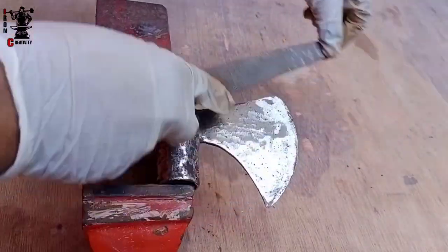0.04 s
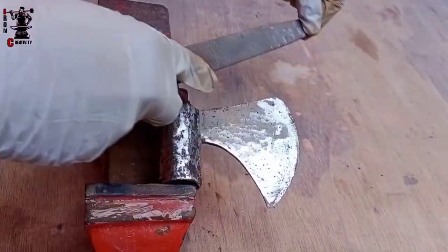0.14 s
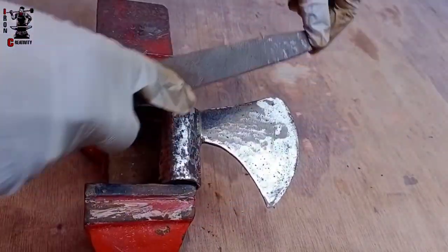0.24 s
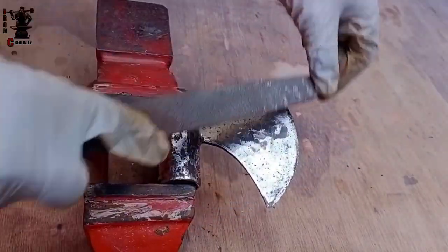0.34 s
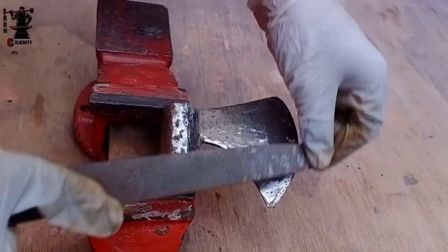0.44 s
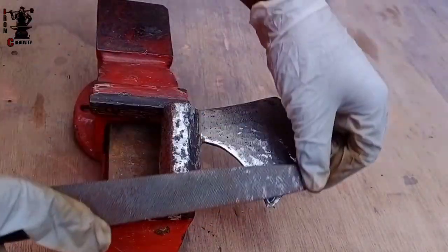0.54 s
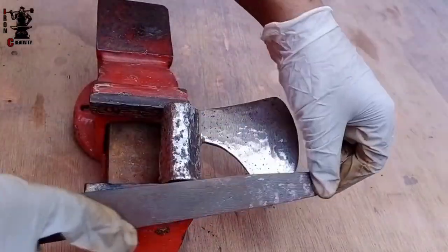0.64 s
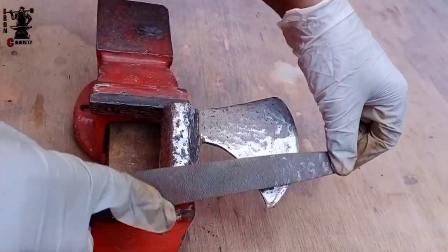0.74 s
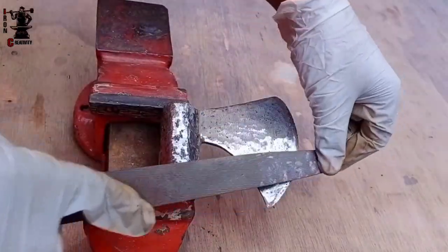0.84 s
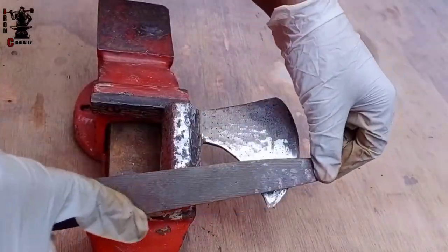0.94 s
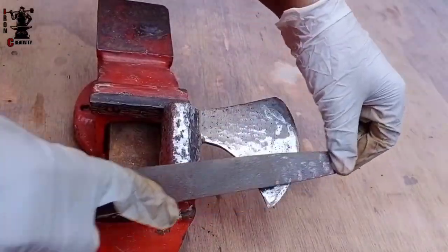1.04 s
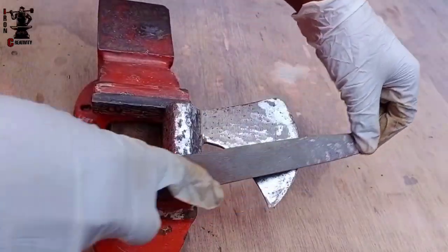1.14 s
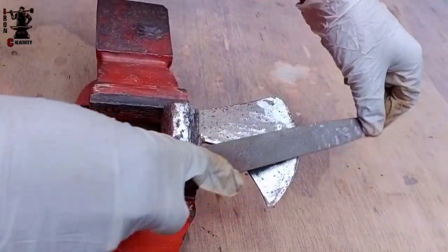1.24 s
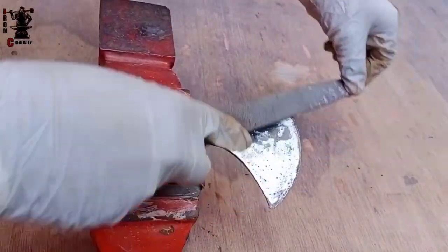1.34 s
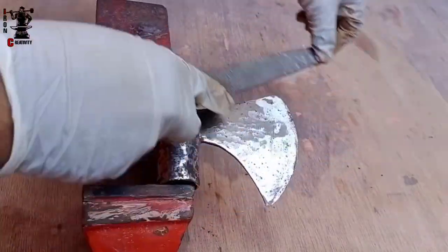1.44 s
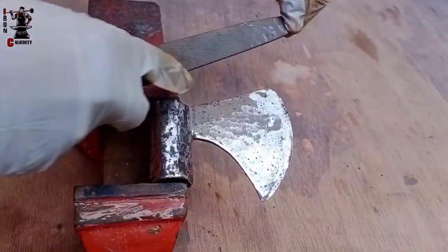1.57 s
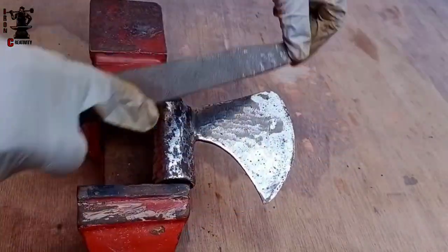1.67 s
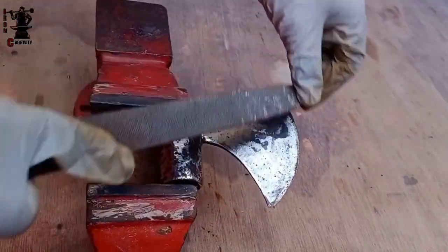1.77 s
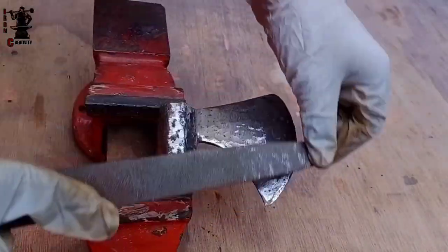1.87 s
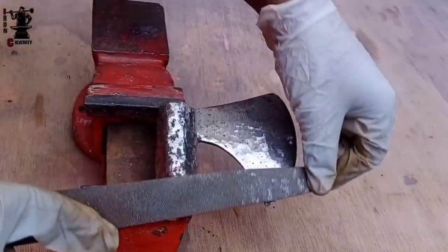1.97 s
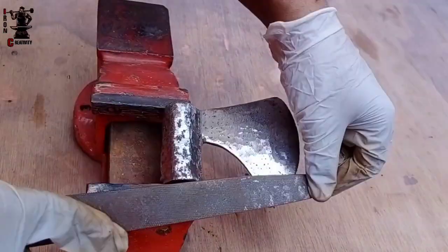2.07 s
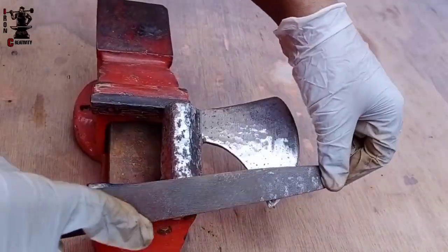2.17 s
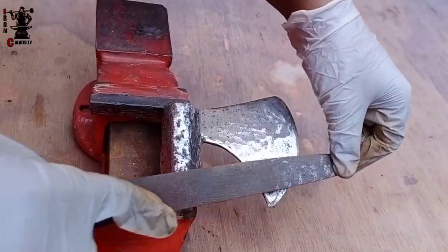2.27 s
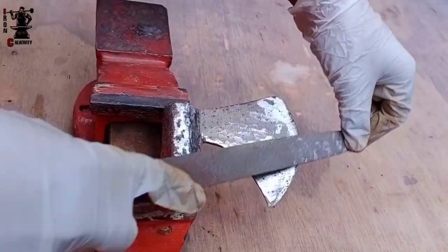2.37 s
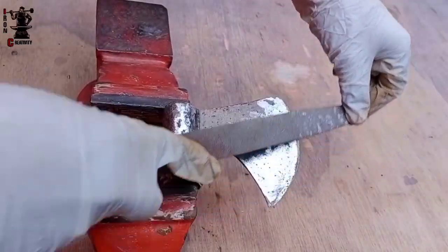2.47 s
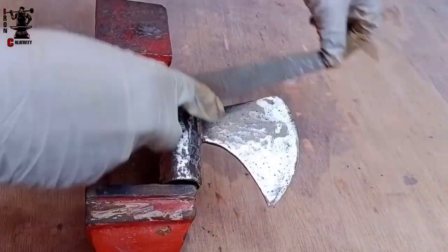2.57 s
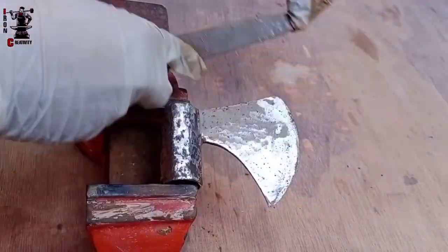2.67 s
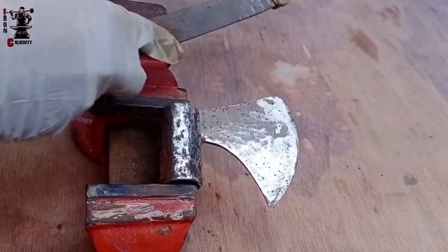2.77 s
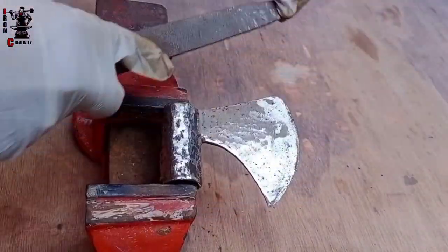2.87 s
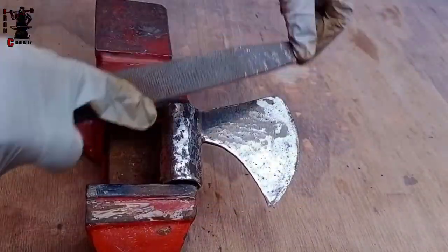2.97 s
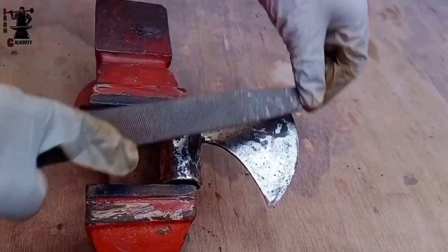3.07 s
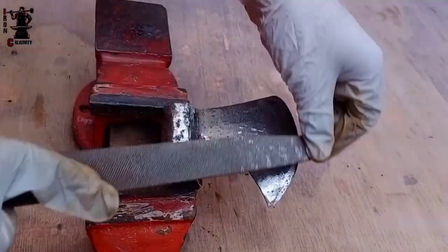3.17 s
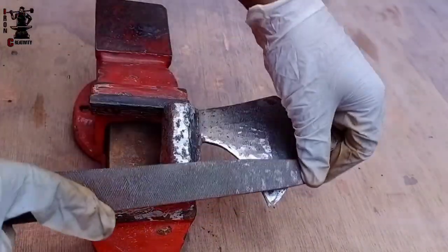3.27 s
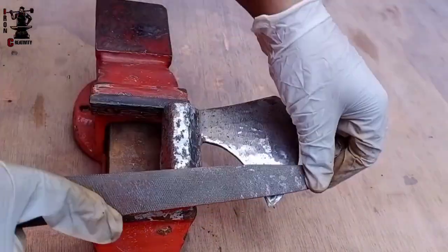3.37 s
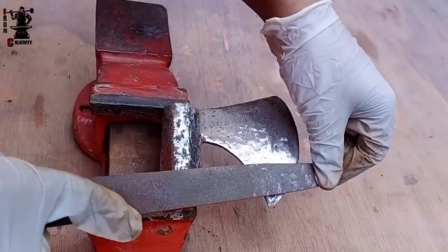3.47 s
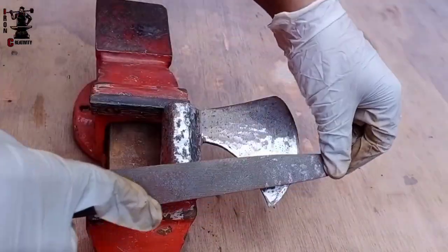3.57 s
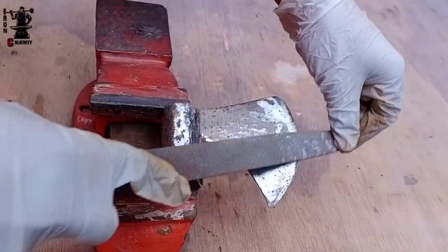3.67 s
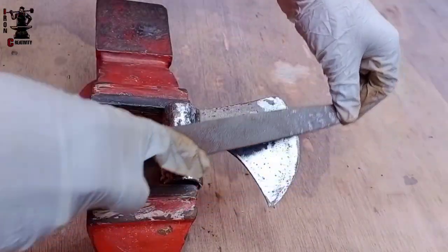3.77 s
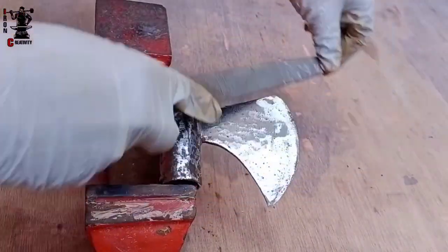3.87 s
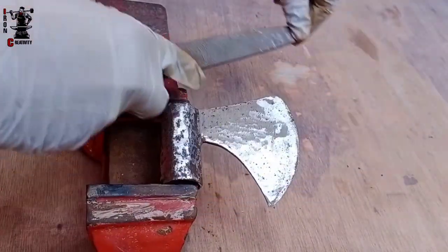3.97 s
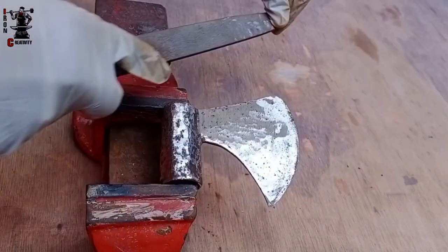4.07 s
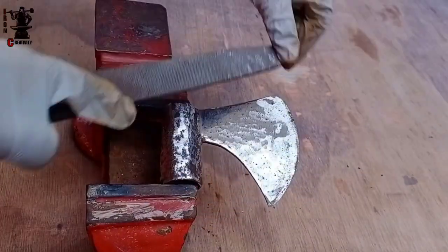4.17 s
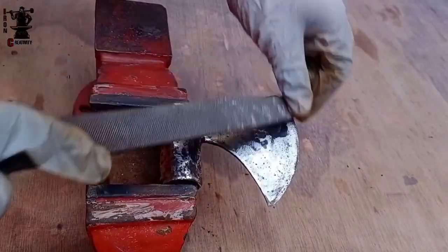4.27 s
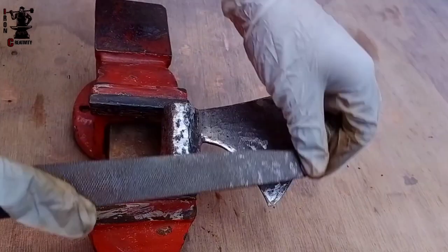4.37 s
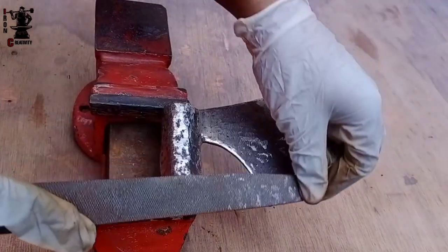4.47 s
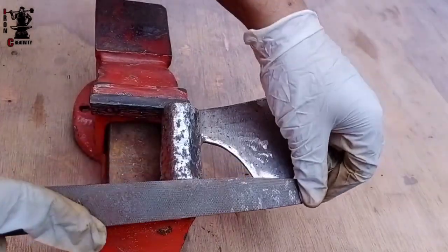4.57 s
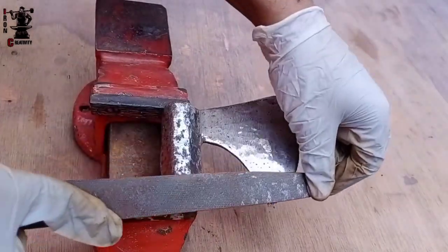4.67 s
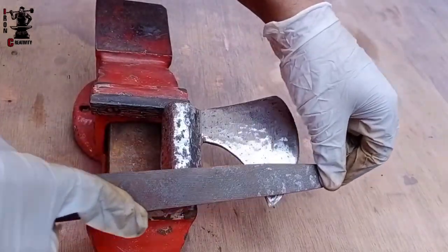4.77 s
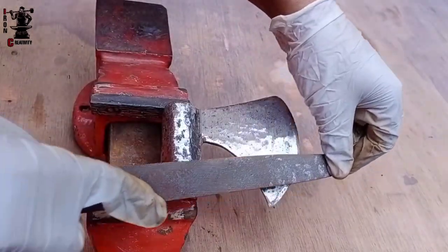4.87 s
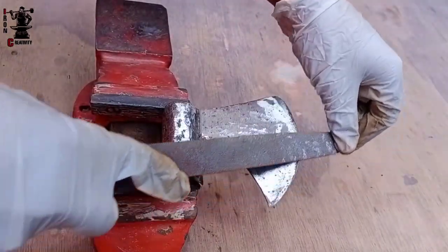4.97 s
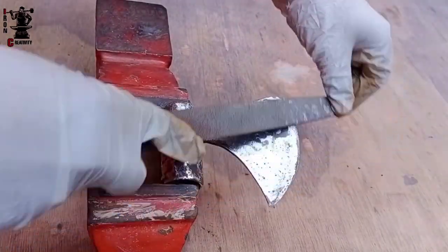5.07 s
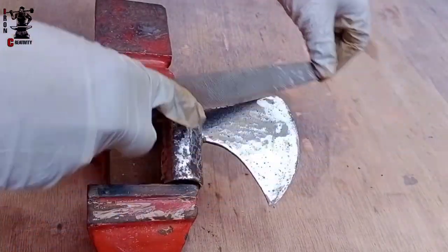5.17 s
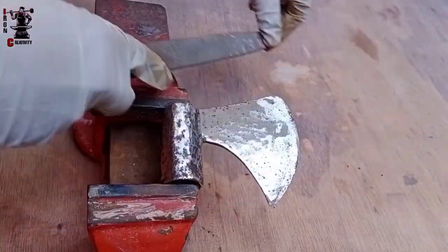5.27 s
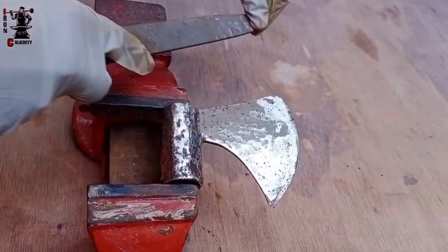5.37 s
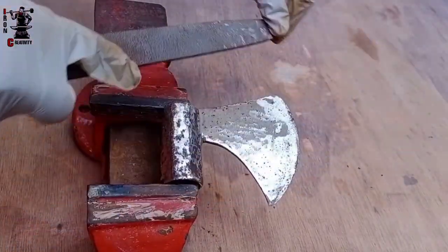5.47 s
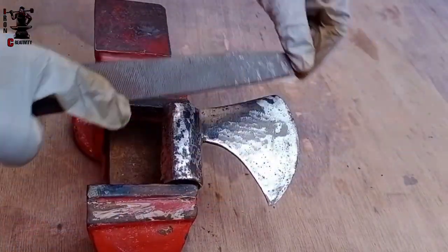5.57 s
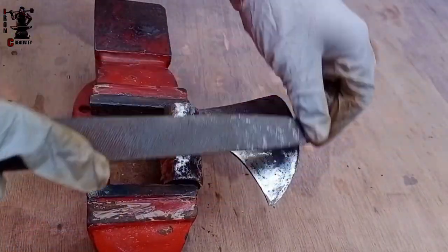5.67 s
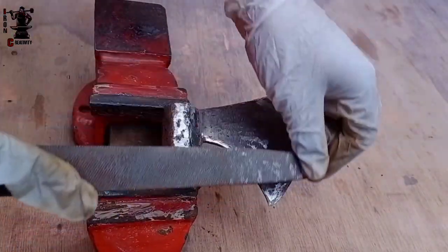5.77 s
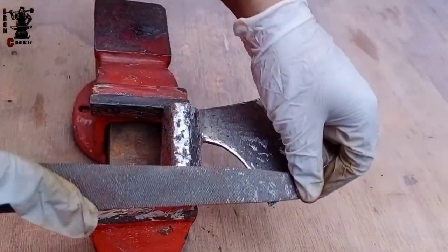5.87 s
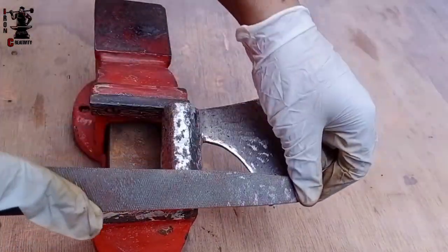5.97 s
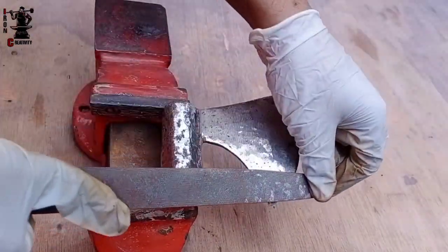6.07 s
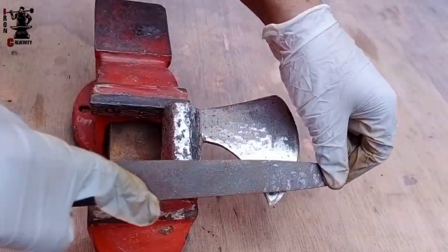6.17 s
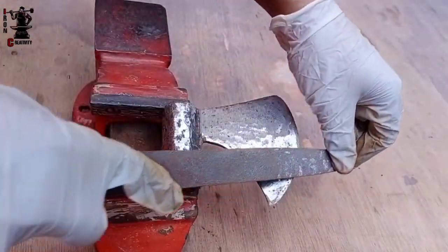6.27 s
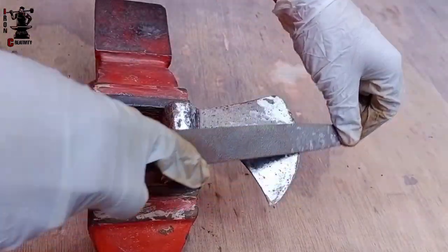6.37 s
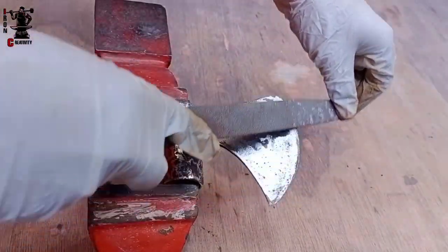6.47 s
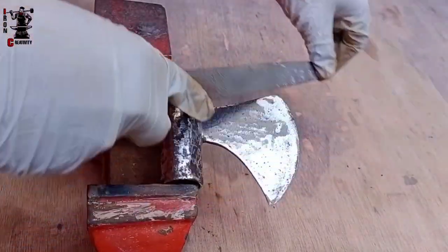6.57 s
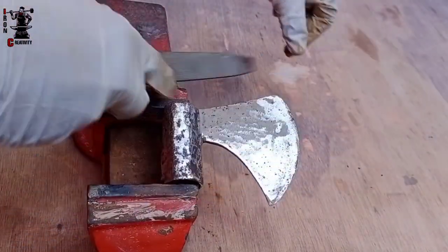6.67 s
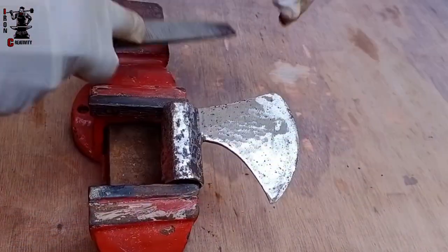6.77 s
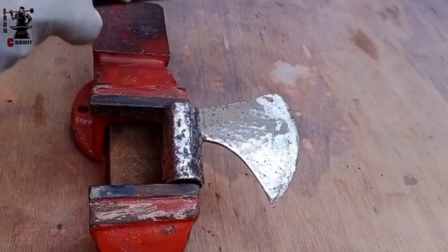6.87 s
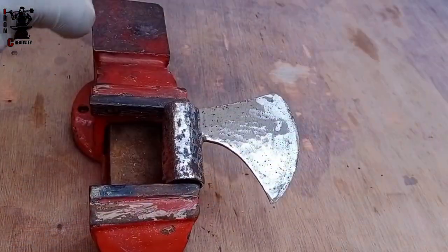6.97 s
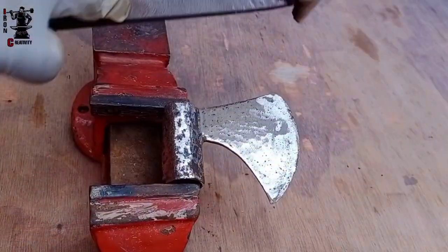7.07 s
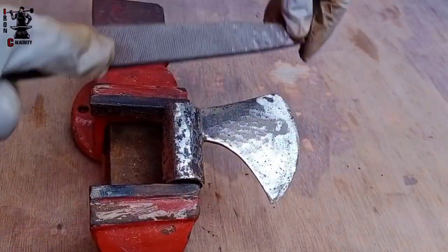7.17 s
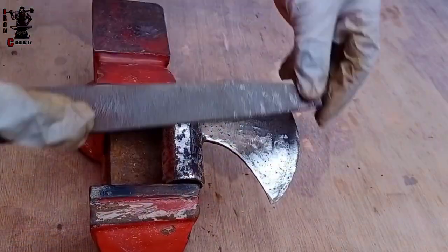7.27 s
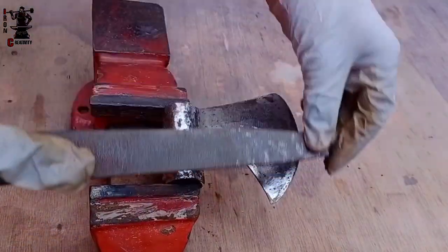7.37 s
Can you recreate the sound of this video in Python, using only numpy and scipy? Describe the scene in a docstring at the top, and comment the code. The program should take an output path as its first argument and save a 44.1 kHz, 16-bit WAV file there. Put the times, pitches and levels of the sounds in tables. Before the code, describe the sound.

Slow, separate strokes of a metal file grate on steel, harsh and toothy, with small catches and a low hum from the bench beneath. Each stroke ends abruptly, leaving a faint clear ring in a quiet room with short echo. After the last one the tool clacks, a glove slides softly, and light metallic ticks follow. Close microphone.

```python
"""A hand file rasps along a steel axe edge held in a vise, heard close by in a workshop.
Tooth pulses, gritty noise and catches excite damped modes of the steel; noise excites the bench.
Each time the file lifts off, the steel rings freely as a sum of decaying sines. Gliding tones with random
swells make faint far chirps and a late scrape near 1.5 kHz; bench groans, ticks, bumps and a glove's rustle
come during, between and after strokes. Decaying noise is the room's answer, over room tone and rumble."""
import sys
import numpy as np
from scipy import signal
from scipy.fft import rfft, irfft, next_fast_len
from scipy.io import wavfile
from scipy.ndimage import uniform_filter1d, map_coordinates

SR = 44100
rng = np.random.default_rng(int(sys.argv[2]) if len(sys.argv) > 2 else 0)


def transcribe(signal):
    """Save signal, clipped to [-1, 1], as a 16-bit WAV file at the path in sys.argv[1]."""
    frames = np.atleast_2d(signal).T
    limited = np.clip(frames, -1, 1)
    pcm = np.round(limited * 32767).astype(np.int16)
    wavfile.write(sys.argv[1], SR, pcm)


N = 327222
TOP_HZ = 15700  # upper band limit

# the file lifts off: (t/s, five ringing strengths/dB at the reference modes of ringing(), muffling starts at t/s)
LIFTS = [(.09, -39, -43.5, -29.5, -29.5, -22, 0.48), (1.46, -33, -27, -33, -25, -16.5, 1.997),
         (2.62, -49.5, -24, -33.5, -15, -6.5, 2.95), (3.93, -33.5, -33.5, -33, -28, -23, 4.3),
         (5.249, -45, -53.5, -34, -31.5, -11.5, 5.54), (6.63, -36.5, -41, -46, -47, -37, 6.74)]


def amp(db):
    """Logarithmic level: dB to linear gain."""
    return 10 ** (np.asarray(db) / 20)


def unit(x):
    """Power normalisation: x scaled to rms 1."""
    return x / np.sqrt(np.mean(x ** 2) + 1e-20)


def along(points, hz):
    """Logarithmic frequency scale: (f/Hz, value) points joined by lines over log frequency."""
    point_hz, values = np.transpose(points)
    return np.interp(np.log(hz + 1), np.log(point_hz + 1), values)


def curves(rows):
    """Linear envelopes: one value per sample for each column after the time."""
    times, *columns = np.transpose(rows)
    return [np.interp(np.arange(N) / SR, times, column) for column in columns]


def wobble(rate, size=N):
    """Band-limited random modulation: a smooth curve through rate random knots a second."""
    step = max(int(SR / rate / 12), 8)
    coarse = np.arange(0, size + step, step)
    knots = rng.standard_normal(int(size * rate / SR) + 4)
    smooth = map_coordinates(knots, [coarse * rate / SR])
    return np.interp(np.arange(size), coarse, smooth)


def wander(depth_db, rate):
    """Slow amplitude modulation: a randomly wandering gain, held for 32 samples a step."""
    step = 32
    gain = amp(depth_db * wobble(rate * step, size=N // step + 1))
    return np.repeat(gain, step)[:N]


def filtered(x, response):
    """Linear filtering: the spectrum of x times a response of frequency."""
    m = next_fast_len(N + SR // 2)
    spectrum = rfft(x, m) * response(np.fft.rfftfreq(m, 1 / SR))
    return irfft(spectrum, m)[..., :N]


def add(track, s, sound):
    """Superposition: mixes a sound in at time s."""
    part = track[round(s * SR):][:len(sound)]
    part += sound[:len(part)]


def resonate(x, modes, drift_db):
    """Modal resonance: the contact point wanders, so each damped mode is driven at a drifting strength."""
    out = np.zeros(N)
    for k, (hz, width_hz, db) in enumerate(modes):
        b, a = signal.iirpeak(min(hz, SR / 2.1), hz / width_hz, SR)
        sign = (-1) ** k
        out += sign * amp(db) * signal.lfilter(b, a, x * wander(drift_db, 14))
    return out


def crowd(x, t60, count):
    """High modal density: close weak modes act like short random tails, whose shares of the drive wander."""
    t = np.arange(SR // 4) / SR
    tails = rng.standard_normal((count, len(t))) * amp(-60 * t / t60)
    shares = np.array([wander(5, 8) for _ in tails])
    shares /= np.linalg.norm(shares, axis=0)  # constant total power
    out = np.zeros(N)
    for share, tail in zip(shares, tails):
        out += signal.fftconvolve(x * share, tail / np.linalg.norm(tail))[:N]
    return out


def chatter():
    """Periodic and random excitation: scattered tooth pulses mixed with the grit of torn chips."""
    # the teeth fall into step: (start t/s, evenness/0-1)
    whines = [(-.06, 0.03), (1.34, 0.07), (2.53, 0.12), (3.81, 0.15), (5.11, 0.03), (6.5, 0)]
    start_hz, speedup_hz_per_s, fastest_hz = 1649, 2900, 1950  # tooth rate, its climb and ceiling
    whine_s = .1
    t = np.arange(N) / SR
    start, evenness = np.transpose(whines)
    nearest = np.searchsorted((start[1:] + start[:-1]) / 2, t)
    since = t - start[nearest]
    rate_hz = np.clip(start_hz + speedup_hz_per_s * since, start_hz / 2, fastest_hz)
    window = np.exp(-(2 * since / whine_s - 1) ** 4 / 2)
    even = np.clip(evenness[nearest] * window, 0, 1)
    turns = np.cumsum(rate_hz) / SR + .1 * wobble(250)
    hits = np.diff(np.floor(turns), prepend=0) > 0
    # a tooth snaps free quickly: its pulse is strongest near 4 kHz
    b, a = signal.iirpeak(3900, 1.7, SR)
    teeth = unit(signal.lfilter(b, a, hits * amp(1.2 * rng.standard_normal(N))))
    grit = unit(rng.standard_normal(N) * amp(2.86 * wobble(900)))
    return np.sqrt(even) * teeth + np.sqrt(1 - even) * grit


def jolts():
    """Impulsive excitation: a burst of decaying noise where the file lands or a tooth catches."""
    # (t/s, initial drive level/dB)
    catches = [(0.6379, -31.5), (1.0161, -29), (1.0505, -16), (1.2288, -12.5), (1.3819, -19.5),
               (2.1236, -32.5), (2.1693, -27.5), (2.275, -25.5), (2.3816, -18.5), (3.3852, -29.5),
               (3.4845, -30), (3.5902, -18), (3.7085, -18.5), (3.8077, -14), (4.6269, -44.5), (4.7351, -34),
               (4.7568, -26.5), (4.9068, -21.5), (4.9816, -16), (5.105, -15.5), (5.9989, -45),
               (6.0402, -29), (6.1105, -27), (6.3465, -16.5), (6.5151, -13), (6.761, -20)]
    t60 = .03  # s
    out, t = np.zeros(N), np.arange(SR // 10) / SR
    for s, db in catches:
        add(out, s, amp(db - 60 * t / t60) * rng.standard_normal(len(t)))
    return out


def pressed_steel(push, catching):
    """Forced vibration of damped modes: distinct ones of axe head and file, and a crowd of lesser ones."""
    # modes of the axe head and the file, damped by the contact: (f/Hz, width/Hz, level/dB)
    head = [(961, 52, -4.5), (1066, 17, -2), (1142, 31, -7.5), (1302, 110, -8.5), (1347, 32, -7.5),
            (1643, 35, 2), (1799, 16, -5), (2410, 35, -4), (2565, 46, -7.5), (2783, 66, 1.5),
            (2915, 36, -8), (3358, 17, -9.5), (3525, 24, -0.5), (3766, 86, -1)]
    # upper modes of the steel under the file: (f/Hz, width/Hz, level/dB)
    pressed = [(6504, 66, -12), (4270, 34, -11), (4509, 60, -1.5), (4660, 65, -5), (4843, 50, -4),
               (5150, 33, -6), (5180, 50, -0.5), (5590, 26, -9.5), (5910, 21, -10), (6010, 66, 1),
               (6130, 40, -10.5), (6890, 46, -6.5), (7040, 46, -9), (7318, 51, -8), (7474, 50, -10.5),
               (7630, 27, -10), (8680, 46, -15), (10390, 64, -20.5), (11160, 74, -23.5), (11870, 40, -21.5),
               (12300, 80, -19), (13250, 87, -12), (14000, 93, -11.5), (14400, 80, -11.5),
               (15000, 41, -9.5), (15250, 59, -15)]
    # spectrum of the crowd of lesser modes: (f/Hz, level/dB per Hz)
    scrape = [(300, -30.5), (560, -8), (760, -9.5), (1000, -4.5), (1500, -1.5), (1960, -9), (2800, -3.5),
              (4100, -4.5), (5100, 2.5), (6400, -8), (7500, -13.5), (9250, -43), (13400, -16), (15500, -19)]
    modes = resonate(push, head + list(pressed), drift_db=3.5)
    main = filtered(modes, lambda hz: 1 / (1 + (850 / (hz + 1)) ** 12))
    mixed = crowd(push, t60=0.041, count=6) + amp(-7.5) * push + amp(1.5) * catching
    lesser = filtered(mixed, lambda hz: amp(along(scrape, hz)))
    return amp(9.5) * main + amp(1.5) * lesser


def balanced(blade, harder_db, to_lift, late):
    """Level-dependent spectrum: sizzle, body and a gap in the scrape change with the rasp and near the lift."""
    # gain at the reference rasp level, and dB gained for each dB the rasp gains
    sizzle_db, sizzle_slope = -1, 0.32
    body_db, body_slope = 1.97, -0.28
    flare_db, flare_s = 5.5, .07  # the sizzle flares around the lift
    part_db, part_s = -22.5, .03  # the body drops out as the steel parts
    notch_hz, notch_width_hz, notch_db = 730, 140, -11  # the gap fills toward the lift
    flare = np.exp(-(to_lift / flare_s) ** 2)
    parted = np.clip(-to_lift / part_s, 0, 1)
    treble_gain = amp(sizzle_db + sizzle_slope * harder_db + flare_db * flare)
    body_gain = amp(body_db + body_slope * harder_db + part_db * parted)
    treble = filtered(blade, lambda hz: 1 / (1 + (9200 / (hz + 1)) ** 16))
    body = filtered(blade, lambda hz: 1 / (1 + (hz / 1950) ** 16))
    blade = blade + treble * (treble_gain - 1) + body * (body_gain - 1)
    gap = filtered(blade, lambda hz: np.exp(-((hz - notch_hz) / notch_width_hz) ** 4))
    return blade + gap * (amp(notch_db * (1 - late)) - 1)


def singing_mode(push, harder_db, late):
    """Lightly damped resonance: one mode of the head sings under the push and is damped toward the lift."""
    # a lightly damped mode of the head: (f/Hz, width/Hz, level/dB)
    lightly_damped = [(2187, 22, 0)]
    sing_db, sing_slope, damp_db = 15, -.3, -10
    level_db = sing_db + sing_slope * harder_db + damp_db * late
    return resonate(push * amp(level_db), lightly_damped, drift_db=2.0)


def bench_hum(touch, rasp_db, harder_db, late):
    """Structure-borne sound: noise following the rasp level excites the bench, more quietly toward the lift."""
    # bench modes: (f/Hz, width/Hz, level/dB)
    bench = [(141.5, 14, 0.5), (175, 39, -5.5), (238, 50, -4.5), (288, 39, 1), (384.6, 40, -8),
             (465.2, 18, -2), (547.6, 21, -4.5)]
    bench_db, bench_slope, wander_db, late_db = 7, -0.61, 2.5, -2
    over_rasp_db = bench_db + bench_slope * np.maximum(harder_db, -18) + wander_db * wobble(12)
    thrum = touch * amp(rasp_db + over_rasp_db + late_db * late) * rng.standard_normal(N)
    return resonate(thrum, bench, drift_db=4)


def filing():
    """Source and resonator: chatter and catches drive the steel while rasp-level noise drives the bench."""
    # one list for each stroke: (t/s, rasp drive level/dB)
    strokes = [
        [(0.0, -16), (0.062, -22.5), (0.084, -23), (0.14, -47.5)],
        [(0.63, -36), (0.642, -26), (0.802, -20.5), (0.84, -39.5), (0.884, -22), (0.956, -26.5), (0.996, -49.5),
         (1.048, -21), (1.266, -23), (1.314, -30), (1.448, -21), (1.486, -29.5), (1.52, -50.5)],
        [(2.115, -47), (2.125, -37.5), (2.155, -30), (2.175, -23), (2.251, -37), (2.283, -27), (2.507, -23.5),
         (2.617, -19.5), (2.645, -24), (2.67, -47.5)],
        [(3.375, -48.5), (3.387, -30.5), (3.405, -40), (3.581, -32), (3.589, -28), (3.785, -24.5),
         (3.807, -19.5), (3.935, -20.5), (3.98, -47)],
        [(4.62, -51), (4.628, -29.5), (4.652, -41.5), (4.814, -29), (4.9, -36.5), (4.978, -26), (5.052, -29.5),
         (5.154, -19.5), (5.24, -20), (5.266, -42.5)],
        [(5.975, -71), (6.005, -36), (6.281, -24.5), (6.331, -27.5), (6.345, -22.5), (6.471, -24.5),
         (6.547, -21.5), (6.585, -23.5), (6.615, -17), (6.665, -33.5), (6.729, -34.5)],
        [(6.73, -33.5), (6.758, -41), (6.764, -27), (6.804, -42.5), (6.84, -52)],
    ]
    firm_db = -25  # reference rasp level
    late_from_s, late_over_s = .4, .2  # when the approach to the lift starts to tell, and its fade
    rasp_db, = curves(np.concatenate(strokes))
    t = np.arange(N) / SR
    touch = sum((t >= rows[0][0]) & (t < rows[-1][0]) for rows in strokes)
    lift_times = np.array([row[0] for row in LIFTS] + [strokes[-1][-1][0]])
    stroke = np.searchsorted([rows[0][0] for rows in strokes[1:]], t)
    to_lift = lift_times[stroke] - t
    late = np.clip((late_from_s - to_lift) / late_over_s, 0, 1)
    harder_db = rasp_db - firm_db
    catching = jolts()
    push = touch * amp(rasp_db + 1.0 * wobble(60)) * chatter() + catching
    blade = balanced(pressed_steel(push, catching), harder_db, to_lift, late)
    singing = singing_mode(push, harder_db, late)
    return blade + singing + bench_hum(touch, rasp_db, harder_db, late)


def background():
    """Shaped random noise: quiet patchy room tone and an unsteady low rumble."""
    # room tone spectrum: (f/Hz, level/dB per Hz)
    air_spectrum = [(35, -32), (60, 5), (178, -6), (503, -15.5), (1450, -17), (1710, -23), (5820, -29.5),
                    (9230, -41.5), (15000, -34.5)]
    # low rumble: (t/s, level/dB before its random wander)
    rumble = [(0, -69.5), (3.5, -66), (4.15, -80.5), (5.83, -80.5), (5.89, -46), (5.96, -83.5), (6.02, -53),
              (6.35, -55), (6.47, -37.5), (6.6, -60), (6.78, -35), (6.9, -71.5), (7.42, -61)]
    room_db = -71
    z = signal.stft(rng.standard_normal(N), nperseg=1024)[2]
    # random gains smoothed over frequency, then time
    field = uniform_filter1d(rng.standard_normal(z.shape), size=5, axis=0)
    field = uniform_filter1d(field, size=9, axis=1)
    patchy = signal.istft(z * amp(4 * unit(field)), nperseg=1024)[1][:N]
    air = unit(filtered(patchy, lambda hz: amp(along(air_spectrum, hz)) * (hz > 100)))
    low = unit(filtered(rng.standard_normal(N), lambda hz: (hz / 80) ** 2.6 / (1 + (hz / 80) ** 7)))
    rumble_db, = curves(rumble)
    return amp(room_db + 2 * wobble(7.5)) * air + amp(rumble_db + 4 * wobble(4.5)) * low


def shop(x):
    """Reverberation: convolution with noise in which each frequency decays at its own speed."""
    # room decay: (f/Hz, t60/s)
    decay = [(150, 0.35), (1000, .3), (5000, 0.23), (9000, 0.078), (13000, 0.16)]
    hz, t, z = signal.stft(rng.standard_normal(SR // 2), SR, nperseg=256)
    fading = z * amp(-60 * t / along(decay, hz)[:, None])
    tail = signal.istft(fading, SR, nperseg=256)[1]
    delayed = np.pad(x, (300, 0))  # samples
    return signal.fftconvolve(delayed, tail / np.linalg.norm(tail))[:N]


def ringing():
    """Free vibration: freed modes swell within milliseconds, waver and decay until the steel is muffled."""
    # modes of the free steel: (f/Hz, level/dB, t60/s)
    free = [(769, 2, 1.55), (1427, -20, .5), (1658, -12, .34), (2175, 0, .2), (2697, 0, .45),
            (3391, -5, .3), (4457, -7, .22), (5233, -8, .16), (5830, -15, .26), (6783, 0, .27),
            (7241, 0, .29), (8592, -25, .16), (10310, -24, .1)]
    # reference modes for the strengths in LIFTS: f/Hz
    reference_hz = (769, 2175, 2697, 6783, 7241)
    out, t = np.zeros(N), np.arange(SR * 2 // 3) / SR
    for s, *strength_db, stop in LIFTS:
        strengths = list(zip(reference_hz, strength_db))
        muffled_db = -60 * (np.maximum(t - stop + s, 0) / 0.25) ** 2
        swell = 1 - np.exp(-t / 0.023)
        for hz, db, t60 in free:
            level_db = db + along(strengths, hz) + 0.6 * wobble(4, size=len(t))
            shape = amp(level_db - 60 * t / t60 + muffled_db) * swell
            cycles = hz * t + rng.random() + 0.11 * wobble(17, size=len(t))
            add(out, s, shape * np.sin(2 * np.pi * cycles))
    return out


def chirps_and_scrape():
    """Narrow-band modulation: random swells blur gliding tones into faint far notes and a late scrape."""
    # far notes, and the scrape near 1.5 kHz at 7.19 s:
    # (t/s, length/s, start f/Hz, end f/Hz, level/dB, blur/Hz)
    glides = [(0.194, 0.28, 2650, 2494, -69.5, 54), (1.552, 0.35, 2176, 2040, -67.5, 78),
              (1.576, 0.15, 1560, 1480, -69, 130), (1.65, 0.068, 1250, 1250, -67, 65),
              (1.93, 0.064, 502, 520, -66, 25), (6.9, 0.1, 450, 420, -70, 50),
              (7.2, .09, 550, 508, -68.5, 40), (1.965, 0.11, 3750, 3720, -66, 127),
              (1.96, .12, 1900, 1900, -72, 330), (2.84, 0.52, 2662, 2604, -71, 40),
              (2.858, 0.32, 2970, 3150, -68.5, 50), (2.915, 0.35, 3445, 3510, -69.5, 75),
              (3.066, 0.18, 3234, 3270, -52, 68), (3.213, 0.167, 3250, 3270, -64, 50),
              (3.147, 0.29, 2120, 2090, -76, 78), (4.065, 0.12, 3123, 2940, -60, 60),
              (4.08, 0.2, 1476, 1510, -65, 115), (4.298, 0.16, 2804, 2744, -71, 30),
              (4.348, 0.11, 1240, 1304, -63.5, 75), (4.361, 0.135, 694, 753, -59.5, 164),
              (4.415, 0.23, 3315, 3404, -57, 24), (4.46, .1, 3340, 3357, -48.5, 11),
              (4.505, 0.11, 2190, 2174, -66, 30), (5.399, 0.27, 1290, 1274, -75, 37),
              (7.149, 0.061, 1160, 1145, -62.5, 230), (7.19, 0.23, 1483, 1520, -65.5, 70)]
    steady_hz = 25  # the smaller the blur beside this, the steadier the tone
    out = np.zeros(N)
    for s, length, start_hz, end_hz, db, blur_hz in glides:
        u = np.linspace(0, 1, int(length * SR))
        phase = 2 * np.pi * np.cumsum(start_hz + (end_hz - start_hz) * u) / SR
        steady = steady_hz / blur_hz
        in_phase = (steady + wobble(blur_hz, size=len(u))) * np.sin(phase)
        quadrature = wobble(blur_hz, size=len(u)) * np.cos(phase)
        rough = (in_phase + quadrature) / np.hypot(1, steady)
        add(out, s, amp(db) * np.abs(np.sin(np.pi * u)) ** 0.54 * rough)
    return out


def groans():
    """Single-mode resonance: the push briefly finds one mode of the bench, a sine that swells and fades."""
    # (t/s, length/s, f/Hz, peak level/dB before a slight waver)
    swells = [(.87, .14, 283, -29.5), (1.24, 0.062, 143, -32), (5.24, .04, 280, -33),
              (6.17, 0.12, 462.6, -34.5), (6.63, 0.054, 279, -33)]
    out = np.zeros(N)
    for s, length, hz, db in swells:
        t = np.arange(int(length * SR)) / SR
        level = amp(db + 1.5 * wobble(30, size=len(t)))
        envelope = np.sin(np.pi * t / length) ** 0.76
        add(out, s, level * envelope * np.sin(2 * np.pi * hz * t))
    return out


def ticks():
    """Transient excitation: band-passed noise bursts tick as the tool is handled; the loud one at 6.74 s is a
    short, sharp catch of the file."""
    # (t/s, peak level/dB, centre f/Hz)
    taps = [(3.3097, -55, 3180), (5.69, -62, 1360), (5.8585, -59, 6400), (5.9742, -44.5, 3870),
            (6.7425, -20, 4550), (7.0339, -59, 3480), (7.1505, -44.5, 3240), (7.173, -43, 1290),
            (7.217, -50, 4100), (7.247, -48, 4100), (7.2644, -48, 4100), (7.2954, -47, 4100),
            (7.311, -35, 4360), (7.379, -38, 5200)]
    out, t = np.zeros(N), np.arange(SR // 8) / SR
    for s, db, hz in taps:
        band = signal.butter(2, [hz / 1.4, hz * 1.23], "band", fs=SR, output="sos")
        tick = signal.sosfilt(band, amp(-60 * t / .015) * rng.standard_normal(len(t)))
        add(out, s, amp(db) * tick / np.abs(tick).max())
    return out


def bumps():
    """Low-frequency pulses: a sine under a brief Gaussian envelope thuds dully through the bench."""
    # (t/s, 30 ms ahead of the envelope's peak; envelope peak level/dB; f/Hz)
    thuds = [(5.86, -51, 90), (6.47, -46, 60), (6.758, -22, 92.4)]
    out, t = np.zeros(N), np.arange(SR // 8) / SR
    for s, db, hz in thuds:
        envelope = np.exp(-((t - .03) / 0.0037) ** 2)
        add(out, s, amp(db) * envelope * np.sin(2 * np.pi * hz * t))
    return out


def glove():
    """Friction noise: uneven grains sound as a coloured rustle and a hiss as a glove slides on the tool."""
    # rustle envelope: (t/s, level/dB)
    sliding = [(6.76, -100), (6.84, -39), (6.898, -60), (6.986, -69.5), (7.078, -58), (7.246, -59.5),
               (7.42, -55.5)]
    # rustle spectrum: (f/Hz, level/dB per Hz)
    colour = [(350, -49), (600, -17), (768, -25.5), (961, -10.5), (1500, 0), (2640, -5.5), (4230, 3.5),
              (6700, -7), (10000, -41), (13000, -68), (22000, -120)]
    hiss_db = -14.5  # over the rustle, before its random wander
    rustle_db, = curves(sliding)
    grains = rng.standard_normal(N) * amp(4.3 * wobble(300) + 3 * wobble(30))
    rustle = unit(filtered(crowd(grains, t60=.03, count=3), lambda hz: amp(along(colour, hz))))
    hiss = unit(filtered(grains, lambda hz: 1 / (1 + (12000 / (hz + 1)) ** 12) * (hz < TOP_HZ)))
    return amp(rustle_db) * rustle + amp(rustle_db + hiss_db + 4 * wobble(14)) * hiss


def scene():
    """Direct and reverberant sound: the faint chirps and scrape get relatively more echo than the near work."""
    near = filing() + ticks() + bumps() + glove()
    faint = chirps_and_scrape()
    echo = shop(amp(-13) * near + amp(-4.5) * faint)
    return (near + faint + ringing() + groans() + echo + background())[None]


def record(dry):
    """Band limitation: a steep low-pass leaves nothing above TOP_HZ."""
    return filtered(dry, lambda hz: np.clip((TOP_HZ - hz) / 150, 0, 1))


dry = scene()
out = record(dry)
transcribe(out)
```